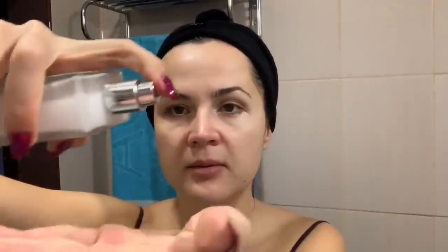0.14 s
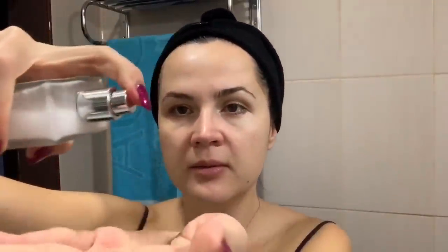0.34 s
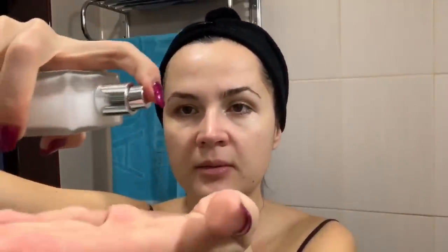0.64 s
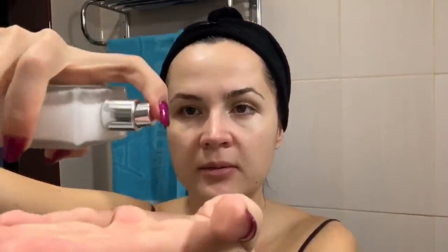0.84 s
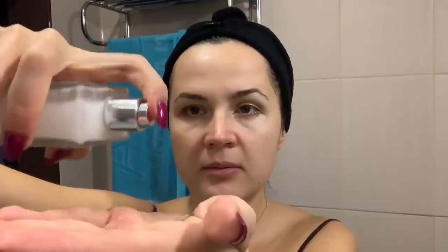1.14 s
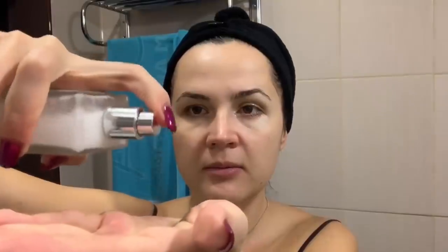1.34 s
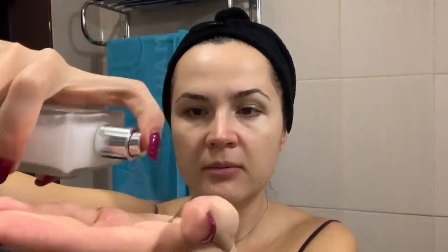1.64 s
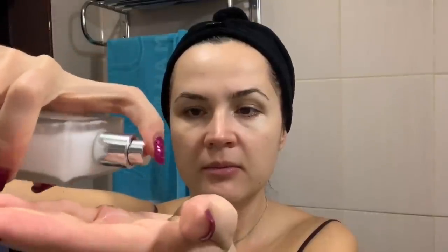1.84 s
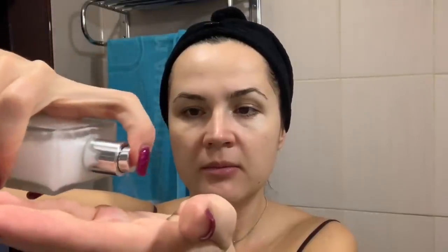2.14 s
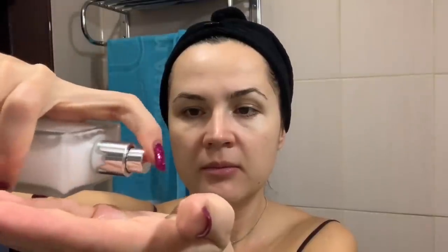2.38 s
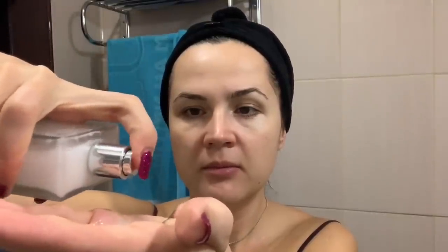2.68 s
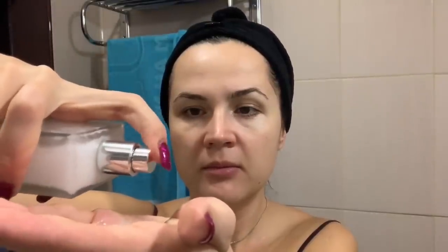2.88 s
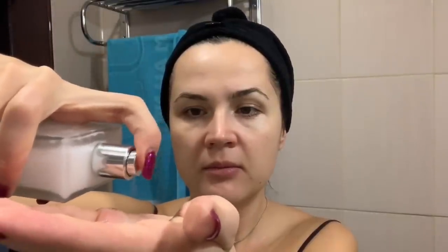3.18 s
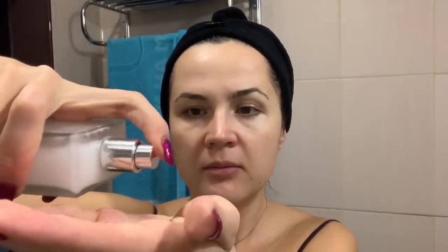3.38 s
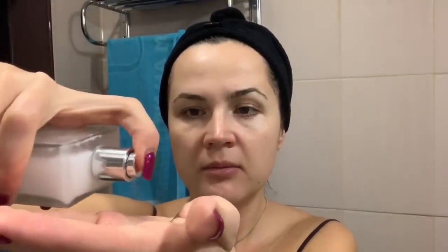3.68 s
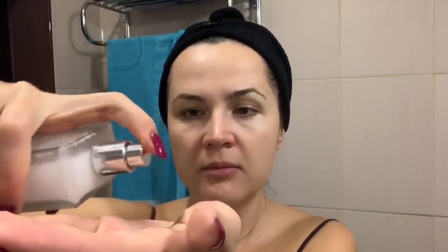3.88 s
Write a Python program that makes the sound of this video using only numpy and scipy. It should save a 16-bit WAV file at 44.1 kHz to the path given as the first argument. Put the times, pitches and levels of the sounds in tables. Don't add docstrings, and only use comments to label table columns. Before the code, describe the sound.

Soft fan rumble and motor hum fill a small hard room. From about one second, six short spritzes come from a pump bottle held near the stereo phone microphone: airy hiss, spitting droplets and patter on skin, each answered by a springy click and short slide as the pump returns. Small nail ticks fall in the gaps. The fifth and sixth bursts are the strongest, and the tiles add a very short bright ring.

```python
import sys
import numpy as np
from scipy import signal
from scipy.fft import rfft, irfft
from scipy.io import wavfile
from scipy.ndimage import uniform_filter1d

SR = 44100
rng = np.random.default_rng(int(sys.argv[2]) if len(sys.argv) > 2 else 0)


def log_audio(samples):
    frames = np.atleast_2d(samples).T
    limited = np.clip(frames, -1, 1)
    pcm = np.round(limited * 32767).astype(np.int16)
    wavfile.write(sys.argv[1], SR, pcm)


def voltage_ratio(decibels):
    exponent = np.asarray(decibels, float) / 20
    return 10 ** exponent


N = 177114
HZ = np.arange(N // 2 + 1) * SR / N + 1e-3

# frequency in Hz, level in dB.
FAN_COLOUR = [(12, -72), (20, -5), (50, -4.5), (107, -6.5), (146, -7.5), (204, -17), (300, -20), (420, -24),
              (897, -38.5), (3160, -44.5), (8000, -48), (15000, -50.5), (15300, -56)]
# frequency in Hz, level in dB, wobble in dB.
MOTOR_HUM = [(98.5, -59, 4.5), (200.3, -71.5, 7.5), (300.4, -64.5, 2.5)]

# time in seconds, peak in dB, pitch of the struck spot in Hz.
NAIL_TICKS = [(0.824, -48, 3170), (0.883, -58, 3200), (1.425, -45, 3300), (1.4849, -43.5, 3170),
              (1.5484, -53, 3120), (2.0273, -40.5, 1730), (2.0892, -46.5, 2870), (2.35, -46.5, 1730),
              (2.5198, -47, 1730), (2.5459, -44, 2862), (2.584, -45.5, 3270), (2.7962, -45, 1730),
              (3.018, -42.5, 3300), (3.0641, -43.5, 2800), (3.5382, -37.5, 2890), (3.5902, -39.5, 3000)]
# time in seconds, peak in dB,
# pitch of the struck spot in Hz, share that shakes the bottle in dB.
PISTON_KNOCKS = [(0.9911, -36, 1950, -29), (0.9982, -33, 3140, -27), (1.0475, -39, 3680, -39),
                 (1.2808, -25.5, 3070, -23), (1.2828, -36, 2980, -25), (1.2875, -49, 3170, -27),
                 (1.2991, -28.5, 2930, -33), (1.631, -46, 3380, -30), (1.8676, -35, 2820, -40),
                 (1.8784, -40, 1600, -25), (1.9123, -44, 3170, -26), (2.1302, -42, 3050, -27),
                 (2.3968, -24.5, 2500, -24), (2.4175, -35, 3520, -18), (2.6048, -33, 3373, -39),
                 (2.8414, -32, 2970, -21), (3.1739, -29, 1740, -28), (3.2887, -46, 1740, -20),
                 (3.3832, -29, 3030, -17), (3.399, -30, 3370, -16), (3.6856, -26, 1850, -14),
                 (3.8554, -32, 3010, -22), (3.8896, -38, 3680, -15.5)]
# time in seconds, peak in dB, pitch in Hz.
CAP_SNAPS = [(1.2804, -62, 5200), (1.288, -43, 8600), (1.3019, -36.5, 8000), (1.4267, -46, 5500),
             (1.8667, -56, 9680), (1.912, -54.5, 5730), (2.033, -39.5, 8270), (2.397, -45.5, 10000),
             (2.5077, -46, 7900), (2.842, -57, 10400), (3.02, -42, 5260), (3.3825, -42, 10540),
             (3.4157, -43, 5420), (3.5365, -53, 10500), (3.8534, -45, 5270), (3.8903, -41, 6200),
             (3.8984, -51.5, 5360)]
# slide or rub starts in seconds, starts to fade in
# seconds, level in dB, sag in dB.
SLIDES_AND_RUBS = [
    (1.269, 1.304, -39.5, 0.5),
    (1.858, 1.915, -56, -1),
    (2.384, 2.416, -43, -2),
    (2.829, 2.854, -46.5, 0),
    (3.368, 3.397, -45.5, 3),
    (1.42, 1.455, -58, -2),
    (2.022, 2.06, -58, -2),
    (3.53, 3.57, -60, -3),
    (3.583, 3.615, -60, -2),
    (3.849, 3.883, -47, -1.5),
]
# frequency in Hz, width in Hz, level in dB.
HEAD_MODES = [(1270, 440, -10.5), (1740, 295, 4), (2130, 310, 4), (2666, 300, -0.5), (3170, 540, 3.5),
              (3680, 125, 0), (4330, 1500, -11.5)]
# frequency in Hz, width in Hz, level in dB.
SPRING_MODES = [(2674, 41, -4), (3120, 24.8, -2.5), (3370, 39, -7.5), (3610, 41, -6.5)]
# frequency in Hz, width in Hz, level in dB.
CAP_MODES = [(5190, 1430, 10.5), (6550, 190, 16), (8750, 1660, 11), (10000, 3000, 5.5), (12800, 4000, -12)]
# frequency in Hz, width in Hz, level in dB.
BOTTLE_MODES = [(310, 580, 1), (560, 164, -3)]
# frequency in Hz, level in dB.
BORE_COLOUR = [(700, -38), (1100, -6), (1700, -9), (2500, -6.5), (2900, -1.5), (3200, 1.5), (3700, -4.5),
               (4300, -13), (6000, -40)]

# valve opens in seconds, full pressure in seconds, finger stops in seconds,
# jet level in dB, sag until the stop in dB.
MIST_GUSHES = [(0.978, 0.99, 1.087, -54, 0.5), (1.622, 1.632, 1.66, -62, 6),
               (1.64, 1.667, 1.728, -49.5, -1), (2.124, 2.161, 2.15, -44.5, -1),
               (2.167, 2.167, 2.236, -43.5, 0), (2.221, 2.234, 2.272, -47.5, -12.5),
               (2.595, 2.624, 2.704, -41, 1.5), (2.71, 2.695, 2.75, -46, -8),
               (3.14, 3.153, 3.16, -38.5, 1.5), (3.156, 3.16, 3.259, -32, -17),
               (3.645, 3.658, 3.662, -52, 3), (3.66, 3.6635, 3.68, -33, -4),
               (3.684, 3.684, 3.71, -29, -5.5), (3.7, 3.72, 3.765, -43.5, -6.5)]
# time in seconds, peak in dB.
SPAT_DROPLETS = [(0.9892, -42), (1.0114, -41), (2.1281, -40), (2.164, -27), (2.2094, -32), (2.595, -35),
                 (2.605, -29), (2.6249, -28), (2.6924, -20), (2.6963, -17), (2.7234, -26), (3.1384, -34),
                 (3.1477, -25), (3.1582, -19), (3.1727, -17), (3.1844, -23), (3.2134, -25), (3.2284, -25),
                 (3.2354, -25), (3.2894, -36), (3.6631, -17), (3.6664, -22), (3.6845, -8), (3.6914, -13),
                 (3.6954, -17), (3.7014, -11), (3.7704, -33)]
# time in seconds, peak in dB, pitch in Hz.
AIR_GULPS = [
    (2.678, -48, 1750),
    (3.159, -44, 1700),
    (3.172, -38, 1730),
    (3.689, -40, 1850),
]
# frequency in Hz, level in dB.
JET_COLOUR = [(3000, -20.5), (6000, -29), (8000, -5.5), (10000, -3.5), (12500, -3), (14500, -1),
              (15600, -7.5), (16200, -39.5)]
# frequency in Hz, level in dB.
DROPLET_COLOUR = [(5000, -29), (7500, -30), (9500, -7.5), (11500, 1), (14500, 3), (15600, 3), (16200, -28)]
# frequency in Hz, level in dB.
PALM_COLOUR = [(700, -51), (1300, -37), (1700, -7), (2300, -1.5), (3600, -0.5), (4600, 0), (5500, 1.5),
               (6300, 4), (7500, 7), (10000, -2.5)]
# frequency in Hz, level in dB.
PATTER_COLOUR = [(200, 21), (350, 20.5), (550, 4.5), (1000, -19), (1500, 2.5), (2200, -37)]
# frequency in Hz, width in Hz, level in dB.
PUDDLE_MODES = [(1065, 750, 0)]
# frequency in Hz, width in Hz, level in dB.
CAVITY_MODES = [(1730, 570, 0)]

# frequency in Hz, 60 dB decay time in seconds.
TILE_DECAY = [(500, 0.25), (3000, 0.17), (9000, 0.13), (15000, 0.066)]
# frequency in Hz, right leads in radians, left minus right in dB.
BOTTLE_PORTS = [(1040, 2, 3.5), (1540, 1.34, -7.5), (2620, 2, -5.5), (3700, 0.95, 0), (4700, 1, -4),
                (5830, 6.5, 6.5), (7450, -1.5, -8.5), (9200, 11, 20), (10500, -4.5, 4.5)]
# frequency in Hz, right leads in radians, left minus right in dB.
MIST_PORTS = [(1490, -1, -4), (2240, 1.94, -8), (3500, -0.35, 1), (4450, 0.5, -1.5), (6340, 3.5, 5),
              (7330, 3, -0.5), (8750, 5, 1), (10500, 7, 2.5)]
# frequency in Hz, share from 0 to 1.
COMMON_BASS = [(40, 1), (300, 1), (700, 0.68), (1500, 0.17), (2500, 0.07)]
# frequency in Hz, share from 0 to 1.
COPIED_TREBLE = [(6500, .05), (8500, .6), (10000, .88), (11000, .985), (16000, .995)]
# frequency in Hz, level in dB.
MIC_ROLLOFF = [(15500, -0.5), (15800, -13), (16050, -46), (16700, -61)]

FIRM_DB, DRIBBLE_DB = -40, -65
COPY_LAG_S = 1 / 2250


def along(points, axis=1):
    table = np.transpose(points)
    return np.interp(np.log(HZ), np.log(table[0]), table[axis])


def unit(x):
    return x / np.sqrt(np.mean(x ** 2))


def later(x, lag_s):
    return np.roll(x, int(lag_s * SR))


def walk(rate):
    k = int(SR / rate)
    return unit(uniform_filter1d(uniform_filter1d(rng.standard_normal(N), k), k))


def hiss(points, gain=1):
    colour = voltage_ratio(along(points))
    noise = rng.choice([-1., 1.], (2, N))
    return irfft(rfft(gain * noise) * colour / np.sqrt(np.mean(colour ** 2)), N)


def ring(x, modes):
    out = np.zeros_like(x)
    for hz, width, db in modes:
        b, a = signal.iirpeak(hz, hz / width, SR)
        out += voltage_ratio(db) * signal.lfilter(b, a, signal.lfilter(b, a, x))
    return out


def strikes(events):
    rows = np.array(events)
    out = np.zeros((1, N))
    out[0, (rows[:, 0] * SR).astype(int)] = voltage_ratio(rows[:, 1])
    return out


def smear(x, fade_s):
    t = np.arange(int(.02 * SR)) / SR / fade_s
    swell = t * np.exp(1 - t)
    return signal.fftconvolve(x, swell[None], axes=1)[:, :N]


def grains(rate, scatter_db):
    hits = rng.random((1, N)) < rate / SR
    return hits * voltage_ratio(scatter_db * rng.standard_normal((1, N)))


def pings(events, cycles):
    out = np.zeros((1, N))
    t = np.arange(int(.012 * SR)) / SR
    for s, db, hz, *_ in events:
        turns = t * hz
        envelope = (1 - np.exp(-turns / 0.63)) * np.exp(-turns / cycles)
        start = int(s * SR)
        out[0, start:start + len(t)] += voltage_ratio(db) * envelope * np.sin(2 * np.pi * turns)
    return out


def stroke(opens, full, stops, db, sag_db, opening_db, fall_db_per_s):
    t = np.arange(N) / SR
    held = np.interp(t, [full, stops], [db, db + sag_db])
    held = held + opening_db * np.clip((full - t) / (full - opens), 0, 1)
    return np.where(t < opens, -200, held + fall_db_per_s * np.maximum(t - stops, 0))


def fan():
    t = np.arange(N) / SR
    hum = np.zeros(N)
    for hz, db, wobble_db in MOTOR_HUM:
        level = np.sqrt(2) * voltage_ratio(db + wobble_db * walk(30))
        hum += level * np.sin(2 * np.pi * hz * t + 1.03 * walk(32.2))
    air = voltage_ratio(-50.5) * hiss(FAN_COLOUR)
    rumble = signal.lfilter(*signal.butter(2, 350, fs=SR), air)
    swell = voltage_ratio(3.8 * walk(11))
    return air + (swell - 1) * rumble + hum


def slide(slip, rattle):
    speed = np.zeros(N)
    for lifts, slackens, db, sag_db in SLIDES_AND_RUBS:
        speed += voltage_ratio(stroke(lifts, lifts + 0.014, slackens, db, sag_db, opening_db=-14, fall_db_per_s=-480))
    scrape = voltage_ratio(-6) * speed * hiss(BORE_COLOUR, gain=slip)
    suck = voltage_ratio(-18) * later(speed, lag_s=0.0057) * unit(ring(slip * rattle, CAP_MODES))
    return scrape + suck


def pump():
    ticks = strikes(NAIL_TICKS)
    head = strikes(PISTON_KNOCKS) + ticks
    cap = strikes(CAP_SNAPS)
    shaken = strikes([(s, db + thud_db) for s, db, _, thud_db in PISTON_KNOCKS])
    bottle = shaken + voltage_ratio(-26) * ticks
    rattle = rng.choice([-1., 1.], (2, N))

    spots = pings(PISTON_KNOCKS + NAIL_TICKS, cycles=1.1)
    knocks = voltage_ratio(14) * ring(head + 0.21 * rattle * smear(head, fade_s=0.00039), HEAD_MODES)
    knocks = knocks + voltage_ratio(7.5) * spots + voltage_ratio(20.5) * ring(spots, SPRING_MODES)
    snaps = voltage_ratio(3) * ring(cap + 0.18 * rattle * smear(cap, fade_s=0.00074), CAP_MODES)
    snaps = snaps + pings(CAP_SNAPS, cycles=6)
    thud = voltage_ratio(17) * ring(smear(bottle, fade_s=0.00012), BOTTLE_MODES)

    slip = unit(smear(grains(rate=600, scatter_db=4), fade_s=.0004) + .3)
    return knocks + snaps + thud + slide(slip, rattle)


def driven(jet_db, db, slope, lag_s):
    reach = voltage_ratio(jet_db) / (voltage_ratio(jet_db) + voltage_ratio(DRIBBLE_DB))
    pressure_db = np.minimum(jet_db, later(jet_db, lag_s)) - FIRM_DB
    return reach * voltage_ratio(db + slope * pressure_db)


def patchy(x, depth_db):
    out = x
    for hz in 2000 * 1.2 ** np.arange(8):
        out = out + (voltage_ratio(depth_db * walk(60)) - 1) * ring(x, [(hz, hz / 5, 0)])
    return out


def palm(jet_db, droplets, sputter):
    mist = driven(jet_db, db=-41.5, slope=0.79, lag_s=0) * patchy(hiss(PALM_COLOUR), depth_db=3)
    splash = voltage_ratio(-22.5) * hiss(PALM_COLOUR, gain=droplets)
    patter = driven(jet_db, db=-56.5, slope=1, lag_s=.04) * hiss(PATTER_COLOUR)
    hollow = unit(ring(sputter * rng.standard_normal((2, N)), PUDDLE_MODES))
    puddle = driven(jet_db, db=-61.5, slope=1.34, lag_s=0.052) * hollow
    return mist + splash + patter + puddle


def spray():
    gushes = [stroke(*g, opening_db=-21.5, fall_db_per_s=-520) for g in MIST_GUSHES]
    jet_db = np.max(gushes, axis=0)
    sputter = unit(1 + .35 * smear(grains(rate=500, scatter_db=3.5), fade_s=.0007))
    droplets = voltage_ratio(-5.5) * smear(strikes(SPAT_DROPLETS), fade_s=.0007)
    jet = voltage_ratio(jet_db) * sputter * voltage_ratio(2) * hiss(JET_COLOUR)
    spat = hiss(DROPLET_COLOUR, gain=droplets)
    blown = unit(ring(rng.standard_normal((2, N)), CAVITY_MODES))
    cavity = driven(jet_db, db=-58.5, slope=2.08, lag_s=.003) * blown
    return jet + spat + palm(jet_db, droplets, sputter) + pings(AIR_GULPS, cycles=9) + cavity


def tiles(x):
    t = np.arange(int(.4 * SR)) / SR
    tail = np.zeros((2, len(t)))
    for hz, t60 in TILE_DECAY:
        band = signal.lfilter(*signal.iirpeak(hz, .7, SR), rng.standard_normal(tail.shape))
        tail += band * voltage_ratio(-60 * t / t60) * (t > .003)
    tail /= np.sqrt(np.sum(tail ** 2, axis=1, keepdims=True))
    return voltage_ratio(-5) * signal.fftconvolve(x, tail, axes=1)[:, :N]


def blend(pair, share):
    left, right = rfft(pair)
    own = np.sqrt(np.clip(1 - abs(share) ** 2, 0, 1))
    return np.array([left, share * left + own * right])


def ports(x, table):
    tilt = voltage_ratio(np.array([[.5], [-.5]]) * along(table, axis=2))
    return irfft(tilt * blend(x, 0.972 * np.exp(1j * along(table))), N)


def scene():
    background = fan()
    bottle = pump()
    mist = spray()
    return ports(mist, MIST_PORTS) + ports(bottle, BOTTLE_PORTS) + tiles(mist + bottle) + background


def top_cut(x):
    return signal.sosfilt(signal.butter(12, 16630, fs=SR, output="sos"), x)


def record(dry):
    bass = np.clip(along(COMMON_BASS), 0, 1)
    treble = np.clip(along(COPIED_TREBLE), 0, 1) * np.exp(-2j * np.pi * HZ * COPY_LAG_S)
    mix = irfft(blend(dry, bass - treble) * voltage_ratio(along(MIC_ROLLOFF)), N)
    return top_cut(mix)


dry = scene()
out = record(dry)
log_audio(out)
```